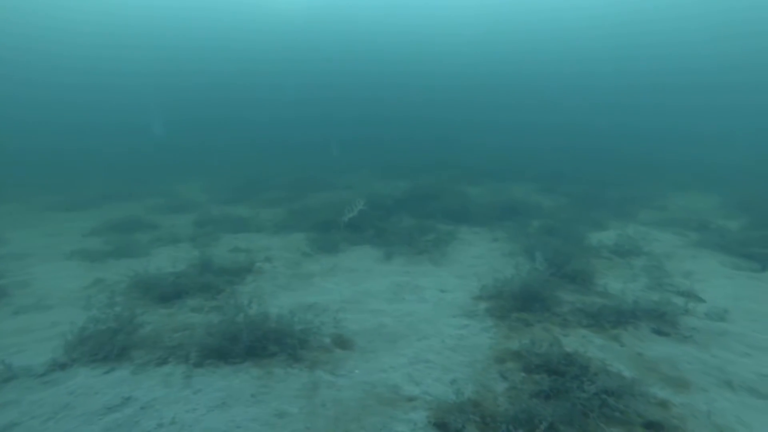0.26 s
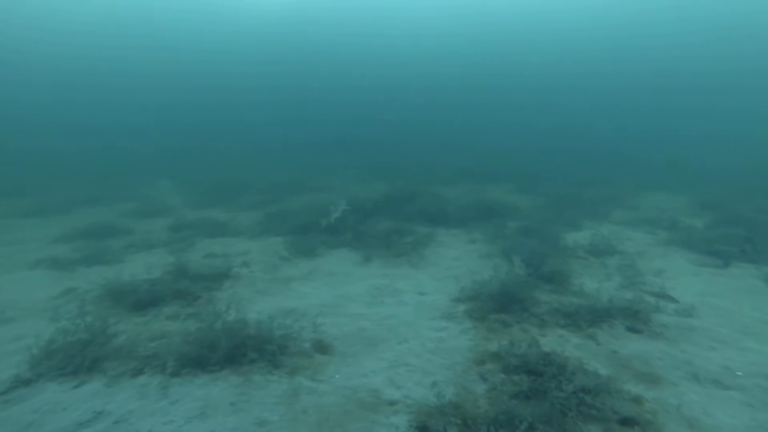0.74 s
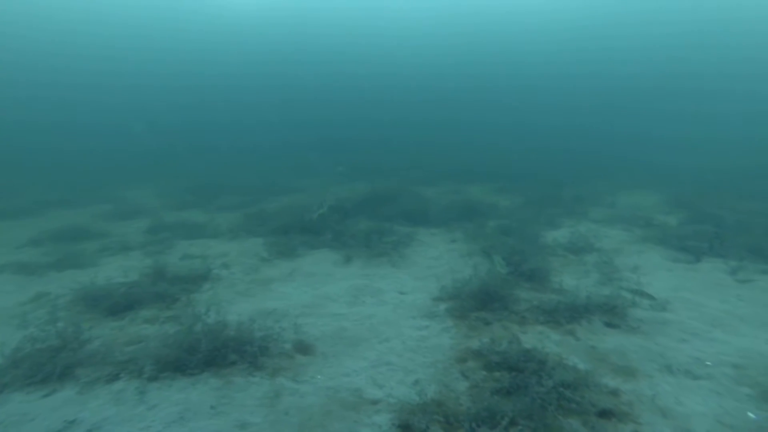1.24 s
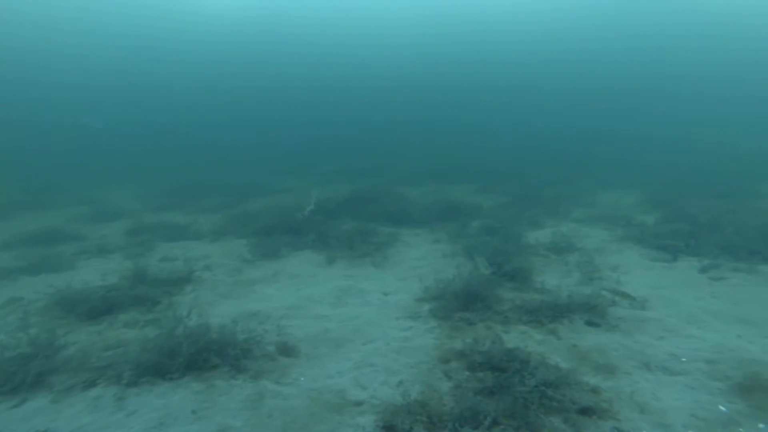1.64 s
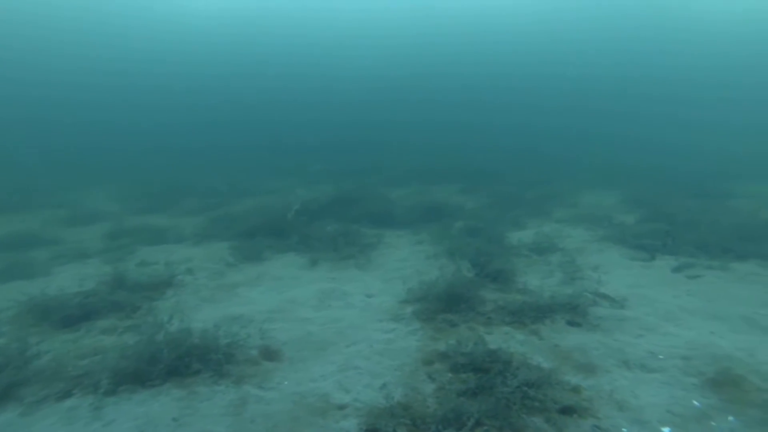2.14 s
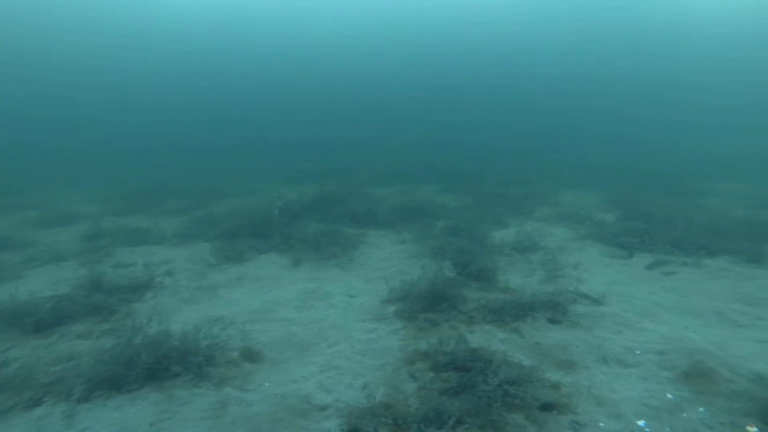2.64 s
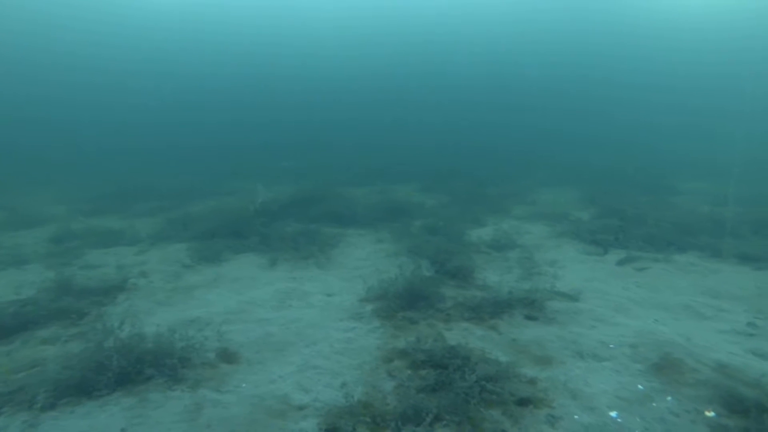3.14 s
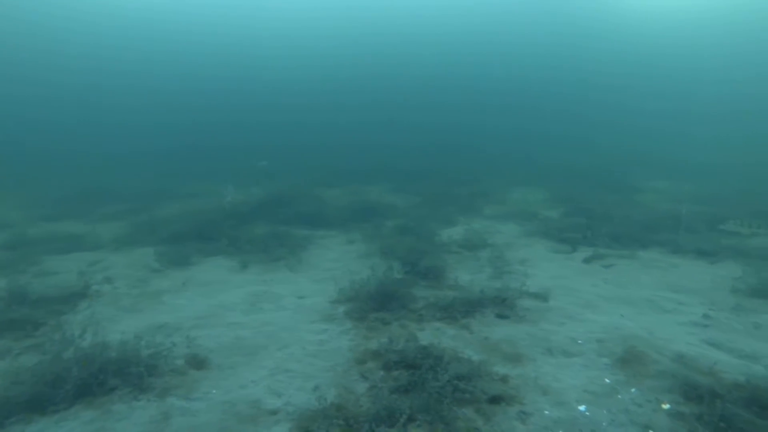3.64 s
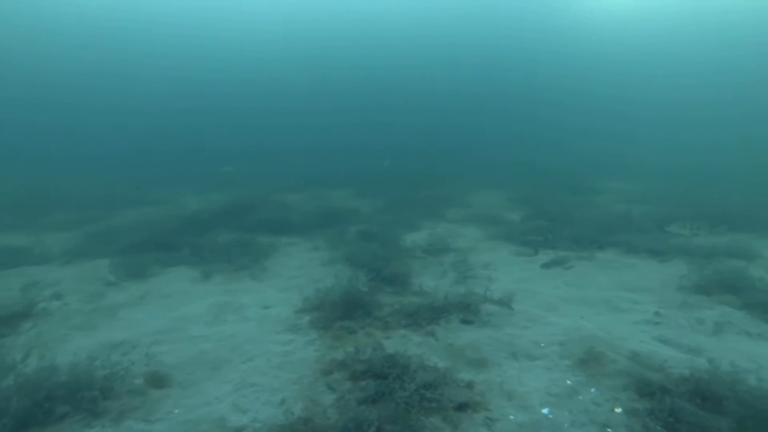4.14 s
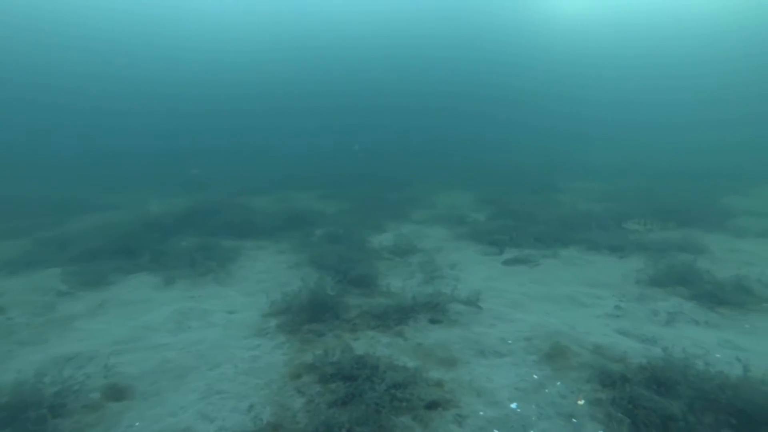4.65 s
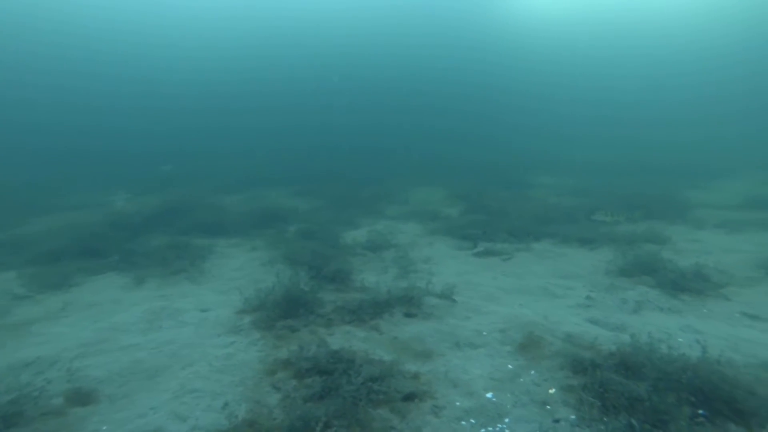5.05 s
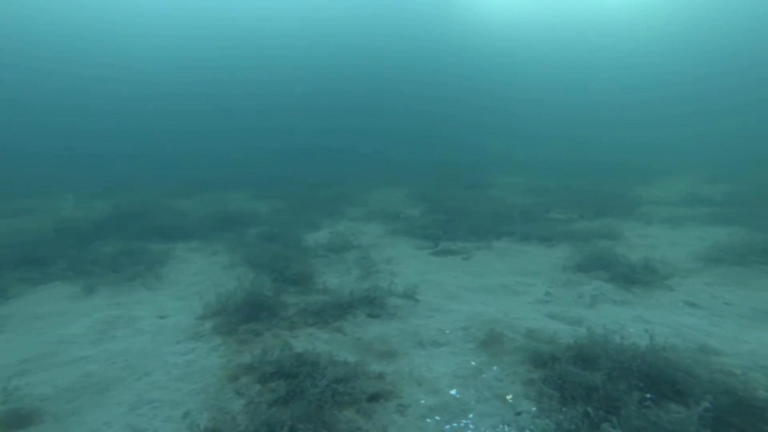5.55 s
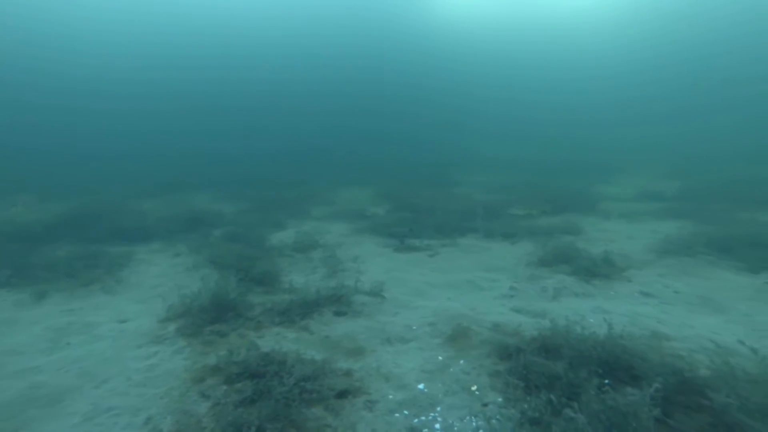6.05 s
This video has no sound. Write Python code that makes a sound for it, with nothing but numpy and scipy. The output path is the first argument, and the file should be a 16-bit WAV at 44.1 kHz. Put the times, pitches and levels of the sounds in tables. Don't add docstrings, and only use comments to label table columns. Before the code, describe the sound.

Inside a sealed camera housing above a weedy lake bed, soft hiss and low rumble continue with a barely audible thin whine. One hard, hollow tap rings briefly at about one second. Sparse grit ticks and small creaks follow, with a light scrape around four seconds, then a tight burst of knocks just after five and a few last faint clicks.

```python
import sys
import numpy as np
from scipy import signal
from scipy.fft import rfft, irfft, next_fast_len
from scipy.io import wavfile
from scipy.ndimage import map_coordinates

SR = 44100
rng = np.random.default_rng(int(sys.argv[2]) if len(sys.argv) > 2 else 0)


def natural_amplitude(level_db):
    exponent = np.asarray(level_db, float) / 20
    return 10 ** exponent


def file_out(sig):
    cols = np.atleast_2d(sig).T
    lim = np.clip(cols, -1, 1)
    pcm = np.round(lim * 32767).astype(np.int16)
    wavfile.write(sys.argv[1], SR, pcm)


N = 277389
TIME = np.arange(N) / SR
FRAME_HZ = 60000 / 1001


def unit(x):
    return x / np.sqrt(np.mean(x ** 2) + 1e-20)


def level(rows):
    s, db = np.transpose(rows)
    return natural_amplitude(np.interp(TIME, s, db, left=-140, right=-140))


def swells(rows):
    gain = np.zeros(N)
    for s, length, db in rows:
        phase = np.pi * np.clip((TIME - s) / length, 0, 1)
        gain += natural_amplitude(db) * np.sqrt(np.abs(np.sin(phase)))
    return gain


def wobble(rate):
    knots = rng.standard_normal(int(N * rate / SR) + 4)
    return map_coordinates(knots, [np.arange(N) * rate / SR])


def filtered(x, response):
    m = next_fast_len(len(x) + 8192)
    return irfft(rfft(x, m) * response(np.fft.rfftfreq(m, 1 / SR)), m)[..., :len(x)]


def resonances(modes, tilt_db=0):
    centre, width, db = np.transpose(modes)[..., None]
    sign = (-1.) ** np.arange(len(modes))[:, None]
    gain = sign * natural_amplitude(db + tilt_db * np.log2(centre / 1000))
    return lambda f: gain * 1j * f * width / (centre * centre - f * f + 1j * f * width)


def body(modes, tilt_db=0):
    return lambda f: resonances(modes, tilt_db)(f).sum(axis=0)


def contacts(events, modes, trim_db):
    out, t = np.zeros(N + SR), np.arange(SR // 8) / SR
    impulse = 1. * (t == 0)
    for s, db, length, tilt_db in events:
        length = max(length, 1e-5)
        onset = 1 - np.exp(-(t + 1 / SR) / (.12 * length))
        push = rng.standard_normal(len(t)) * onset * np.exp(-(t / length) ** 2)
        response = resonances(modes, tilt_db)
        rings, clean = filtered(push, response), filtered(impulse, response)
        share = np.linalg.norm(clean, axis=1) / np.linalg.norm(rings, axis=1)
        sound = share @ rings
        out[round(s * SR):][:len(t)] += natural_amplitude(db + trim_db) * sound / np.abs(sound).max()
    return out[:N]


def cushioned(x, edge_hz):
    return filtered(x, lambda f: 1 / (1 + 1j * f / edge_hz) ** 2)


# centre in Hz, width in Hz, level in dB.
AIR_POCKET = [(174, 41, -28), (526, 80, -10), (712, 103, -9), (1146, 78, -6), (1343, 41, 2),
              (1620, 76, -13), (2030, 180, -20.5), (2700, 160, -27.5), (3120, 440, -32), (4050, 250, -30.5),
              (4860, 300, -33.5), (6700, 640, -62)]
# start in seconds, peak in dB, contact length in seconds, tilt in dB per octave.
TAPS = [
    (.9817, -11.5, 0.000018, 1.5),
    (.9868, -36.5, .00002, -0.5),
]


def tap():
    return cushioned(contacts(TAPS, AIR_POCKET, trim_db=2.0), edge_hz=2900)


# centre in Hz, width in Hz, level in dB.
MOUNT_MODES = [(375, 53, 4.5), (966, 110, 4.5), (1420, 162, 5), (2000, 110, 0), (2880, 460, -22),
               (4680, 420, -25.5), (6600, 1500, -38), (10000, 2500, -54)]
# start in seconds, peak in dB, contact length in seconds, tilt in dB per octave.
MOUNT_KNOCKS = [
    (5.046, -39, 0.0097, -6),
    (5.0514, -29, 0.000018, -5),
    (5.0534, -18.5, .00002, 2),
    (5.0552, -19, 0.000025, 6),
    (5.057, -26, 0.0044, 3.5),
    (5.084, -39, 0.0064, -1),
    (5.1, -39, 0.0075, 8),
    (5.112, -37, 0.0082, 0),
    (5.2385, -32, 0.0064, 3),
    (5.2415, -32.5, 0.000021, -0.5),
]


def knocks():
    return cushioned(contacts(MOUNT_KNOCKS, MOUNT_MODES, trim_db=0), edge_hz=4600)


# centre in Hz, width in Hz, level in dB.
HOUSING_MODES = [(285, 44, -11.5), (379, 30, -4), (467, 32, -4), (716, 42, 2.5), (914, 36, -10.5),
                 (1156, 42, -6), (1570, 140, -15), (2620, 730, -23)]
# start in seconds, peak in dB, contact length in seconds, tilt in dB per octave.
HOUSING_CREAKS = [(.716, -44.5, 0.0079, 0.5), (1.957, -40.5, 0.0042, -2.5), (2.335, -51, 0.0054, 1),
                  (2.7525, -40.5, 0.0027, -1), (2.769, -45.5, 0.0043, 4), (3.184, -50, 0.011, 2),
                  (3.524, -57, 0.01, -1), (4.008, -51, 0.0091, -5), (4.147, -42, 0.017, 8),
                  (4.8445, -30.5, 0.0061, -2), (4.851, -30, 0.011, -3), (4.864, -36, 0.016, -3),
                  (4.895, -48, 0.029, -14), (6.035, -50.5, 0.0068, 5.5), (6.2565, -43, 0.0056, -0.5),
                  (6.281, -44, 0.009, 4.5)]


def creaks():
    return cushioned(contacts(HOUSING_CREAKS, HOUSING_MODES, trim_db=1.5), edge_hz=4500)


# centre in Hz, width in Hz, level in dB.
SHELL_MODES = [(800, 280, -9), (1480, 110, 3), (2070, 560, -9.5), (2600, 81, 0.5), (3400, 810, -13.5),
               (4560, 1000, -7), (5200, 1350, -10.5), (7340, 420, -13.5), (10400, 1700, -25.5),
               (12500, 3100, -30)]
# start in seconds, peak in dB, contact length in seconds, tilt in dB per octave.
SHELL_SNAPS = [
    (.859, -56.5, 0.0044, -0.5),
    (2.3965, -39.5, 0.0022, 3),
    (2.3995, -41.5, 0.0026, -1.5),
    (2.422, -52, 0.013, 4.5),
    (4.589, -51.5, 0.0041, -3.5),
]


def snaps():
    return contacts(SHELL_SNAPS, SHELL_MODES, trim_db=5.0)


# start in seconds, peak in dB, ring in Hz, upper ring in Hz, upper ring in dB.
GRIT_TICKS = [(0.9028, -31.5, 1280, 2250, 1), (1.1797, -59, 1420, 2930, -7),
              (1.2241, -42.5, 1670, 3170, -4.5), (2.1248, -39, 1200, 2930, -18),
              (2.2792, -56.5, 1200, 3100, 6), (2.8125, -39.5, 1410, 2580, -16),
              (2.92, -42, 1520, 3030, -20), (4.009, -43, 710, 2450, -12), (4.029, -50, 1150, 2220, -5),
              (4.149, -32, 746, 2500, -14), (4.3076, -53.5, 1200, 2930, 10.5),
              (4.3494, -42, 970, 2890, -14), (4.589, -30.5, 1670, 2800, -17),
              (5.8144, -42.5, 1220, 2880, -26), (5.8511, -56, 1900, 3050, 5),
              (6.0342, -46, 1150, 2960, -17)]


def ticks():
    out, t = np.zeros(N + SR), np.arange(SR // 10) / SR
    low_cycles, high_cycles = 26.3, 24.5

    def ring(hz, cycles):
        return natural_amplitude(-60 * t * hz / cycles) * np.sin(2 * np.pi * hz * t)

    onset = 1 - np.exp(-t / 0.0019)
    for s, db, low_hz, high_hz, high_db in GRIT_TICKS:
        high = ring(high_hz, high_cycles) + natural_amplitude(-11) * ring(1.36 * high_hz, high_cycles)
        rings = natural_amplitude(-12) * ring(low_hz, low_cycles) + natural_amplitude(high_db) * high
        out[round(s * SR):][:len(t)] += natural_amplitude(db + 7) * onset * rings
    return out[:N]


# start in seconds, length in seconds, level in dB.
CLAMP_RUBS = [(.18, 0.31, -67), (1.48, 0.17, -65), (1.99, 0.091, -58.5), (2.34, 0.096, -68),
              (2.79, .05, -68), (3.172, 0.032, -57), (3.262, 0.016, -64), (3.58, 0.2, -68.5),
              (4.0, 0.21, -58), (4.24, 0.067, -63.5), (4.36, 0.12, -64.5), (5.34, 0.21, -64.5)]
# start in seconds, length in seconds, level in dB.
MOUNT_RATTLES = [
    (4.94, 0.072, -61),
    (5.11, 0.063, -62.5),
]
# time in seconds, level in dB.
GLOVE_SCRAPE = [
    (3.995, -85),
    (4.012, -63.5),
    (4.05, -58.5),
    (4.15, -53),
    (4.19, -63.5),
    (4.22, -80),
]
# centre in Hz, width in Hz, level in dB.
GLOVE_MODES = [(100, 110, 0), (454, 230, -1), (1200, 130, -7), (2080, 140, -2), (2435, 160, 1.5),
               (2930, 310, -8.5), (4600, 1000, -19), (6300, 1400, -22.5)]


def friction():
    def slips():
        return rng.standard_normal(N) * natural_amplitude(3.5 * wobble(120))

    rub = swells(CLAMP_RUBS) * unit(filtered(slips(), body(HOUSING_MODES[:-1], tilt_db=4)))
    rattle = swells(MOUNT_RATTLES) * unit(filtered(slips(), body(MOUNT_MODES, tilt_db=-2.5)))
    rasp = filtered(slips(), body(GLOVE_MODES)) * natural_amplitude(0.89 * wobble(200))
    return rub + rattle + natural_amplitude(1.5) * level(GLOVE_SCRAPE) * unit(rasp)


# start in seconds, peak in dB, swing in Hz.
WATER_SHOVES = [
    (.39, -49, 29.8),
    (.64, -51.5, 34.6),
    (0.855, -55, 45.2),
    (1.089, -51, 35),
    (4.944, -52, 40),
    (5.048, -41.5, 69),
    (5.237, -47, 69),
    (5.321, -51, 35),
    (5.79, -46.5, 69),
]


def shoves():
    out = np.zeros(N)
    for s, db, hz in WATER_SHOVES:
        after = np.clip(TIME - s, 0, 1)
        out += natural_amplitude(db + 6.0) * np.sin(2 * np.pi * hz * after) * np.exp(-1.6 * hz * after)
    return out


# frequency in Hz, density in dB per Hz.
FLOOR_SPECTRUM = [(12, -43), (20, 3.5), (82, -3), (256, -12.5), (589, -18.5), (736, -19), (998, -21.5),
                  (1510, -21.5), (2170, -26), (3030, -22.5), (3780, -30.5), (4990, -29), (7150, -36),
                  (9700, -37.5), (15100, -43)]
# time in seconds, level in dB.
FLOW_LEVEL = [(0.0, -58.5), (4.26, -60), (4.35, -52), (4.68, -65.5), (5.01, -57), (5.06, -45), (5.12, -58),
              (5.2, -67), (5.24, -60), (5.36, -58.5), (6.22, -58.5), (6.29, -58)]


def water():
    hz, db = np.transpose(FLOOR_SPECTRUM)

    def colour(f):
        return natural_amplitude(np.interp(np.log(f + 1), np.log(hz), db))

    def hiss_response(f):
        return colour(f) * f ** 2 / (f ** 2 + 130 ** 2)

    def rumble_response(f):
        return colour(np.maximum(f, 20)) * f / (f + 6) / (1 + (f / 130) ** 2)

    hiss = filtered(rng.standard_normal(N), hiss_response)
    rumble = filtered(rng.standard_normal(N), rumble_response)
    surge = wobble(5)
    flow = level(FLOW_LEVEL) * natural_amplitude(1 * surge + 2.5 * wobble(18))
    return natural_amplitude(-63.5 + 0.53 * surge) * unit(hiss) + flow * unit(rumble)


def fizz():
    phase = (TIME * FRAME_HZ) % 1
    gate = np.exp(-((phase - .72) / .11) ** 2) * natural_amplitude(2.5 * wobble(40))
    modes = [(3050, 290, 5.5), (5350, 490, -16.0), (7360, 5800, -16.0)]  # Hz, width Hz, dB
    return natural_amplitude(-75.0) * unit(filtered(gate * rng.standard_normal(N), body(modes)))


# multiple of the frame rate, level in dB rms.
READOUT_TONES = [(48, -92), (49, -91), (110, -101), (147, -104), (156, -98), (157, -98), (164, -96),
                 (165, -101), (174, -99), (175, -104), (202, -103), (211, -98), (212, -102), (213, -106),
                 (219, -101)]


def whine():
    out = np.zeros(N)
    for k, db in READOUT_TONES:
        cycles = k * FRAME_HZ * TIME + rng.random()
        out += natural_amplitude(db + 3 + wobble(2)) * np.sin(2 * np.pi * cycles)
    return out


def scene():
    hits = tap() + knocks() + creaks() + snaps()
    background = water() + fizz() + whine()
    return (hits + ticks() + friction() + shoves() + background)[None]


def microphone_port(x):
    def notches(f):
        upper = np.exp(-((f - 13600) / 450) ** 2)
        lower = np.exp(-((f - 11200) / 500) ** 2)
        return natural_amplitude(-2 * upper - 2 * lower)
    return filtered(x, notches)


def treble_dropouts(x):
    hz, t, z = signal.stft(x, SR, nperseg=1024)
    busy = np.abs(z[(hz > 300) & (hz < 3000)]).max(axis=0) > natural_amplitude(-50)
    hz = hz[:, None]
    odds = .42 * np.exp(-((hz - 13600) / 500) ** 2) + .3 * (hz > 13000)
    draws = rng.random((len(hz) // 4 + 1, len(t) // 3 + 1))
    patches = np.kron(draws, np.ones((4, 3)))[:len(hz), :len(t)]
    lost = (patches < odds) | (busy & (hz > 13000))
    kept = ~lost & (hz < 15270)
    makeup = natural_amplitude(2.5 * (hz > 13000))
    return signal.istft(z * kept * makeup, SR, nperseg=1024)[1][:N]


def low_pass(x):
    return signal.sosfilt(signal.butter(12, 15270, fs=SR, output="sos"), x)


def record(dry):
    mix = treble_dropouts(microphone_port(dry[0]))
    return low_pass(mix[None])


dry = scene()
out = record(dry)
file_out(out)
```